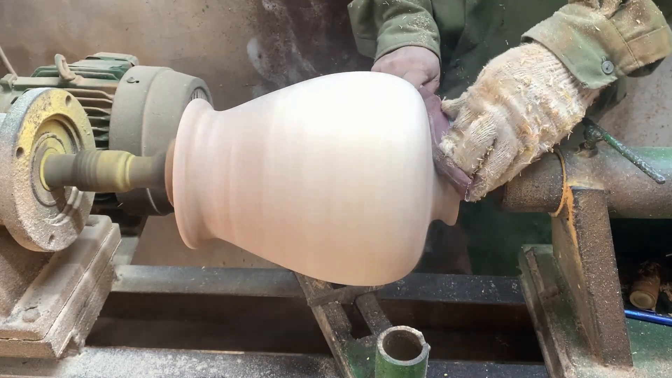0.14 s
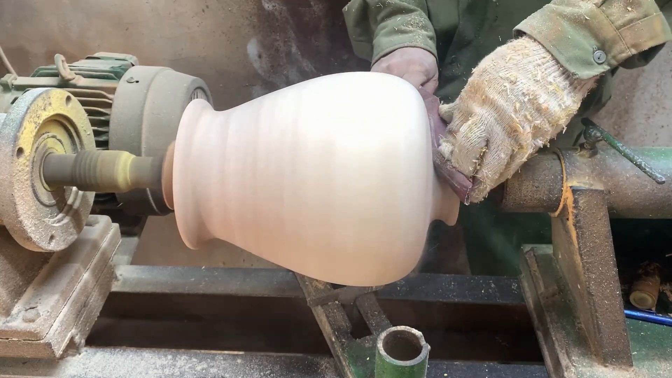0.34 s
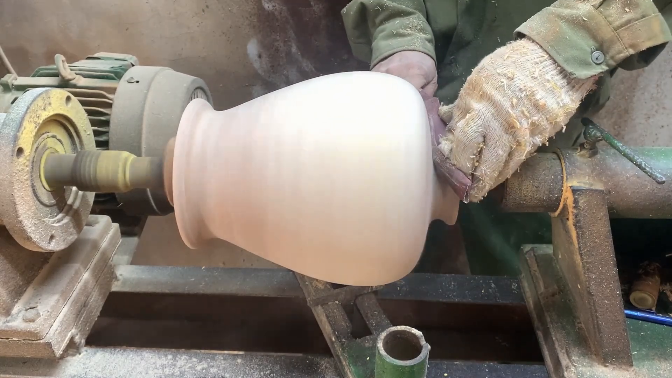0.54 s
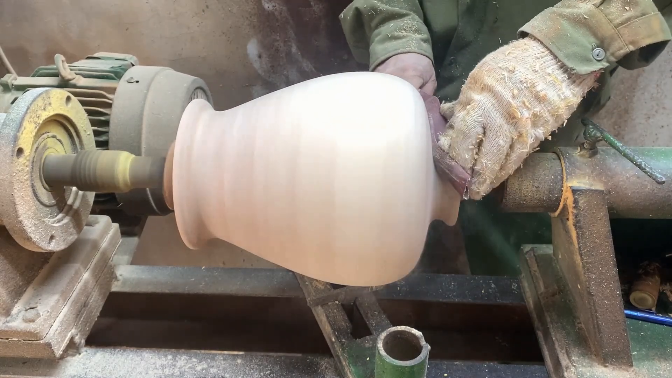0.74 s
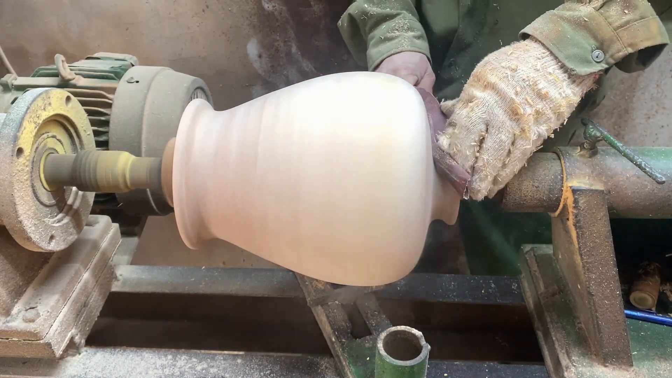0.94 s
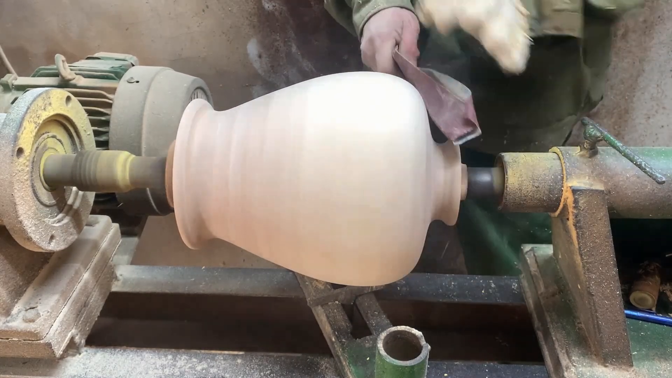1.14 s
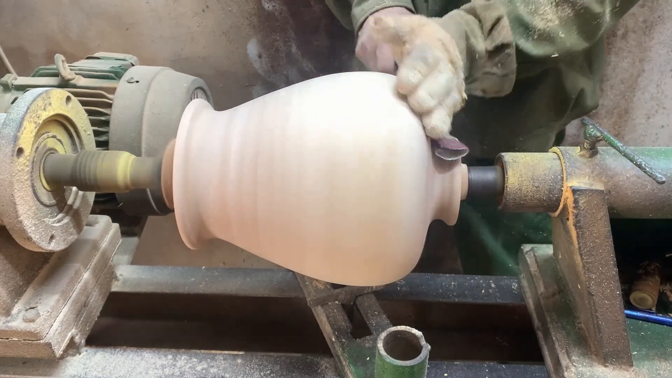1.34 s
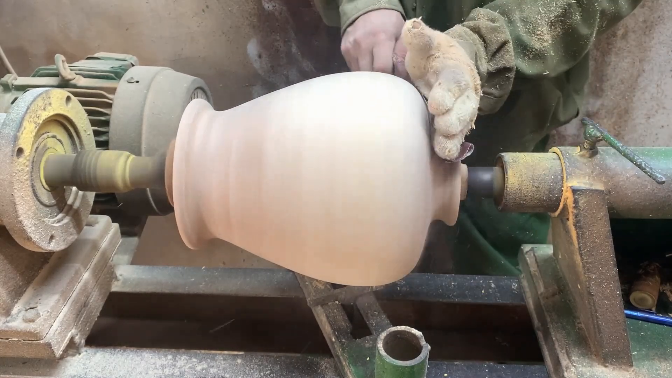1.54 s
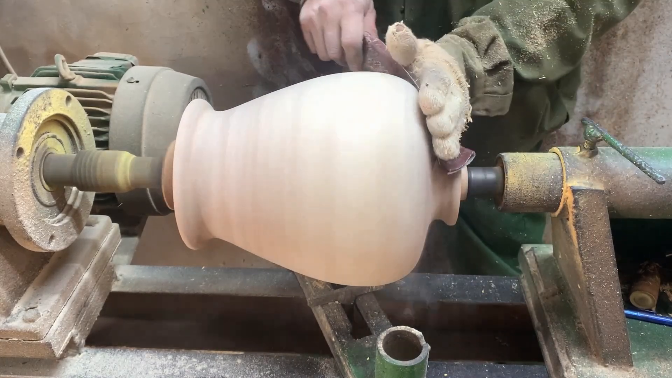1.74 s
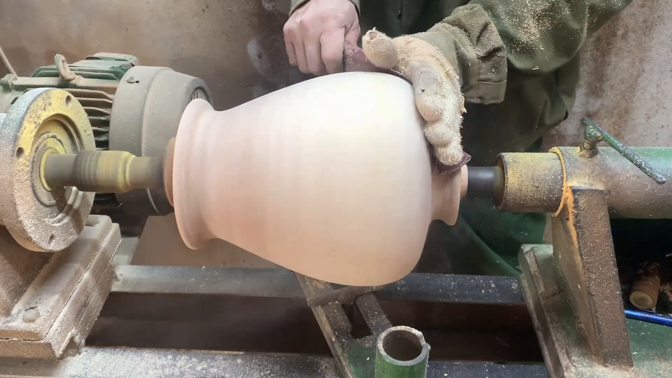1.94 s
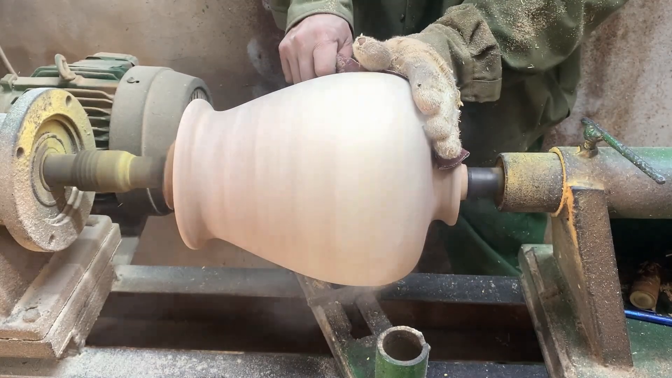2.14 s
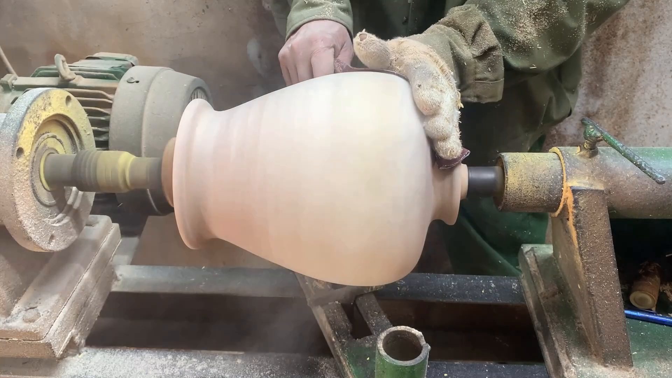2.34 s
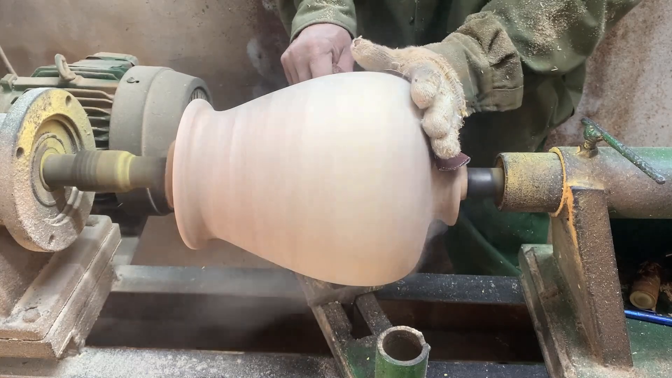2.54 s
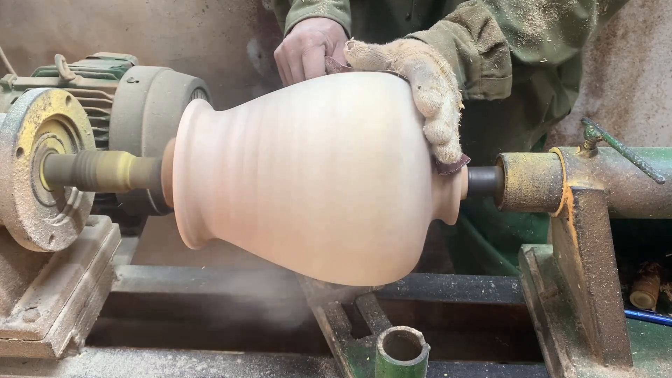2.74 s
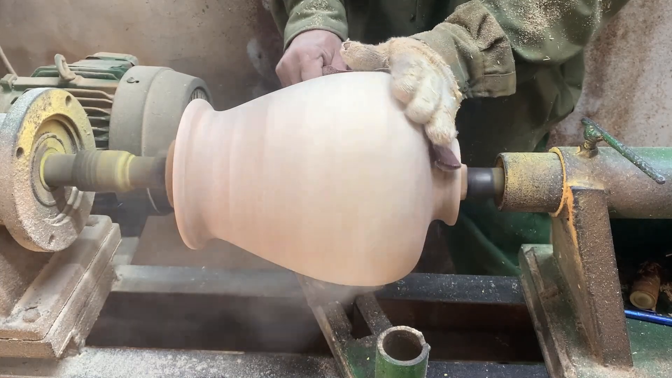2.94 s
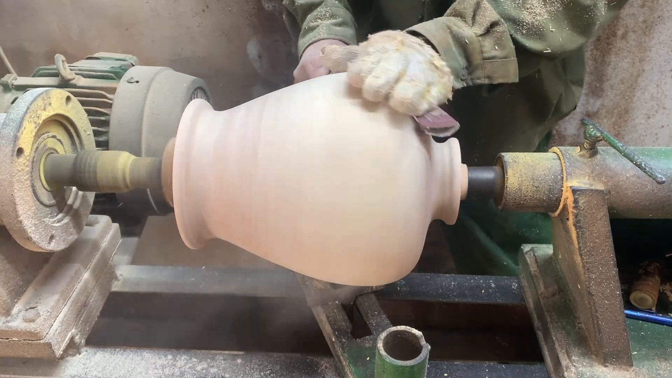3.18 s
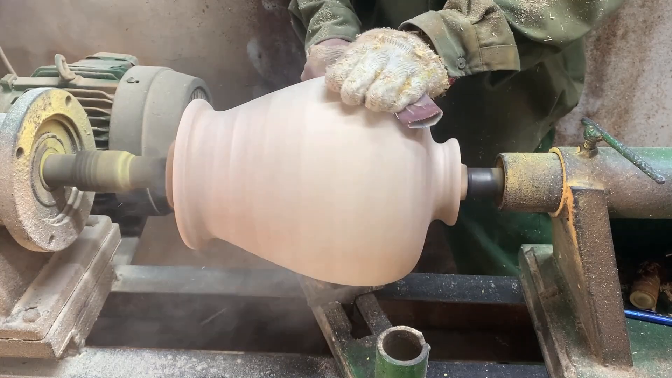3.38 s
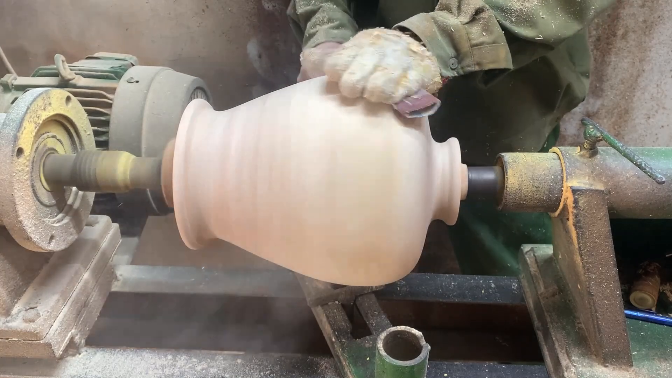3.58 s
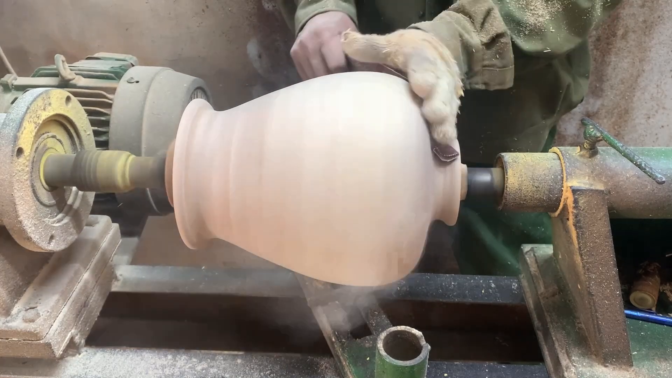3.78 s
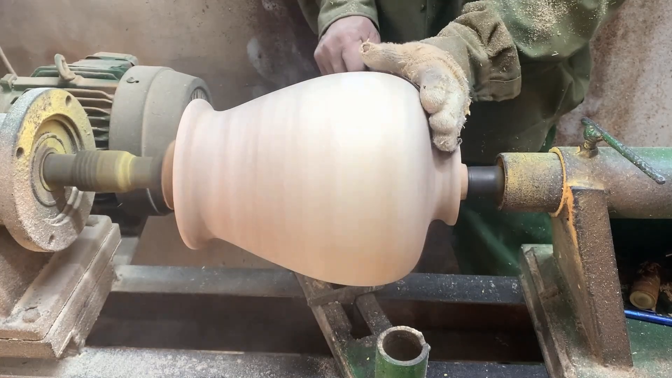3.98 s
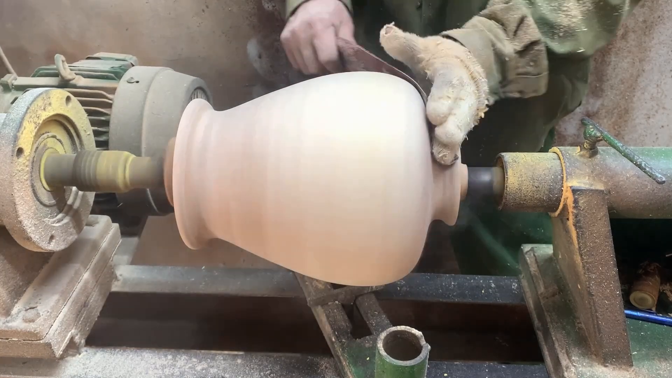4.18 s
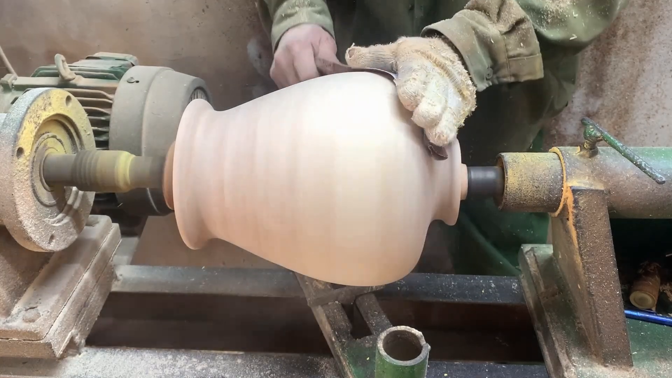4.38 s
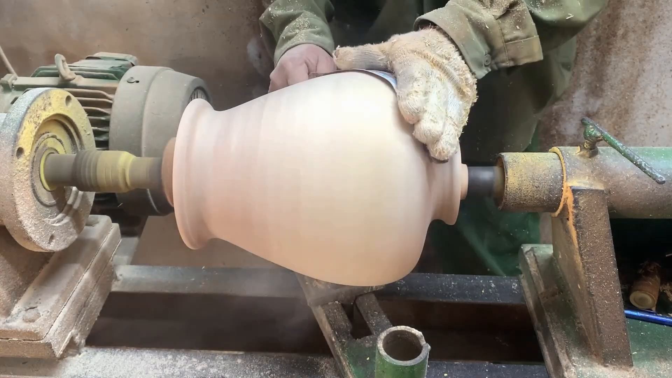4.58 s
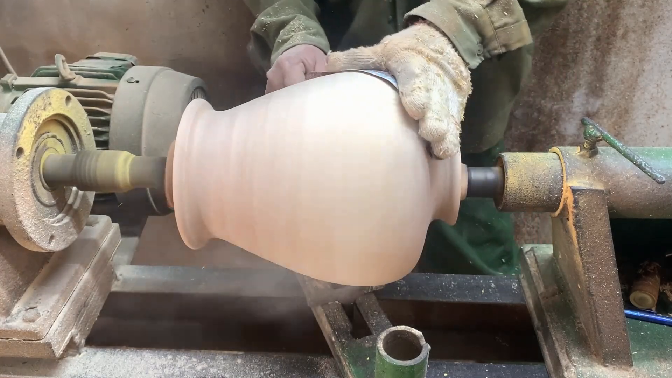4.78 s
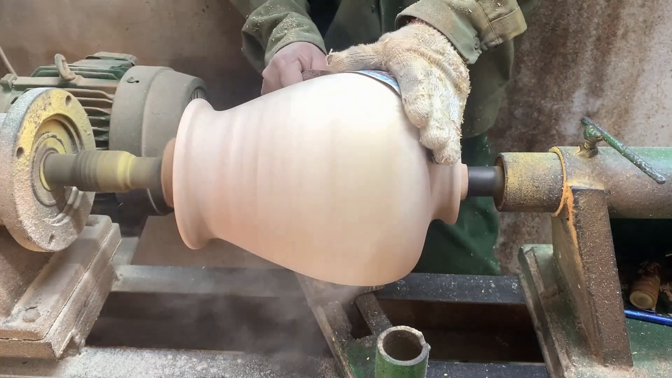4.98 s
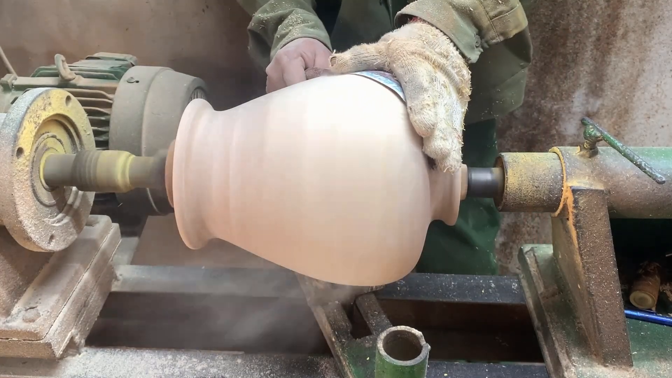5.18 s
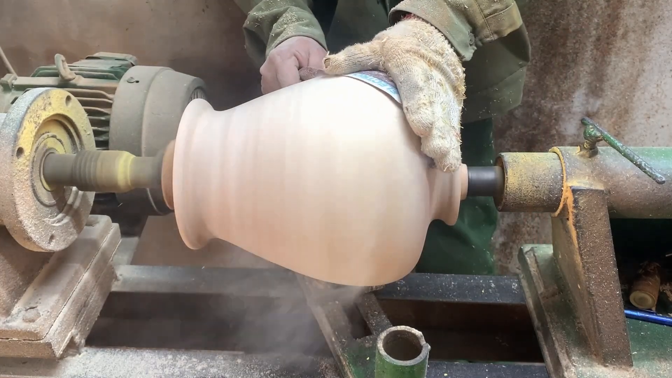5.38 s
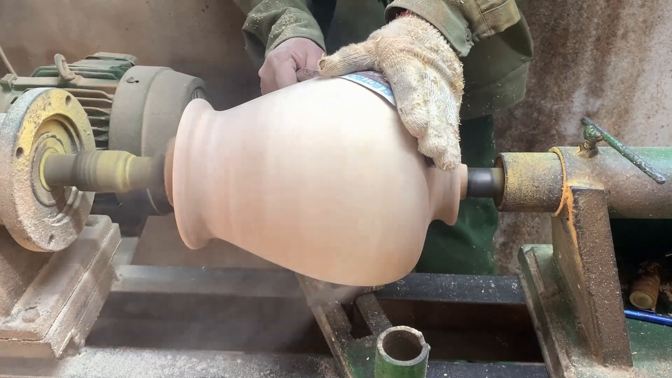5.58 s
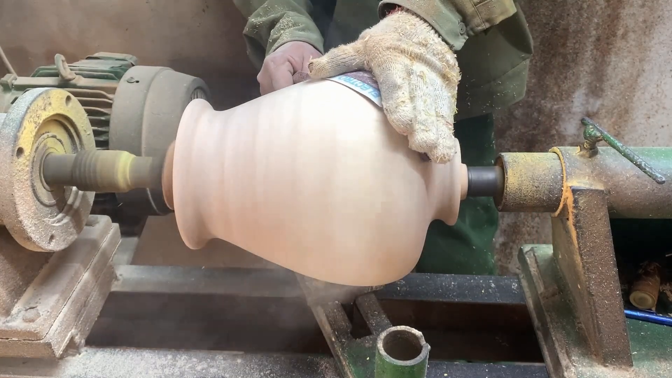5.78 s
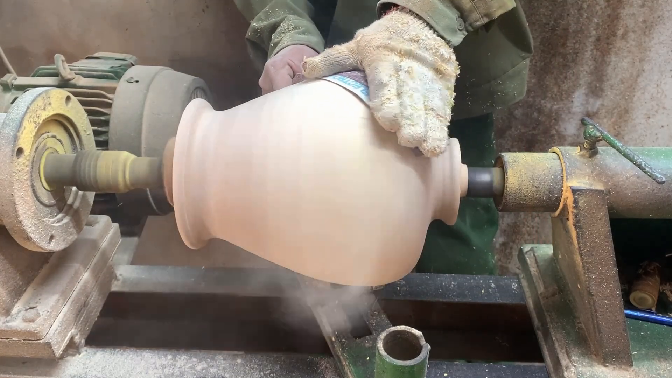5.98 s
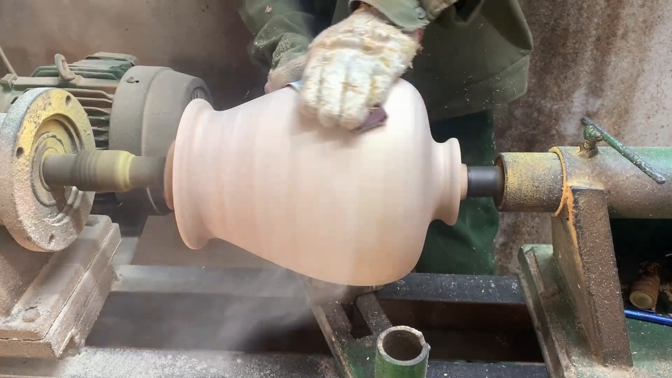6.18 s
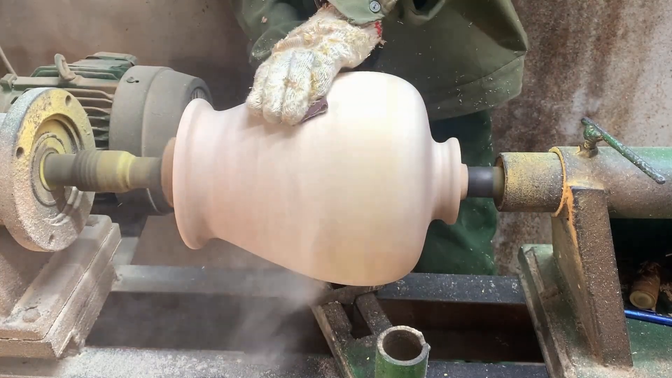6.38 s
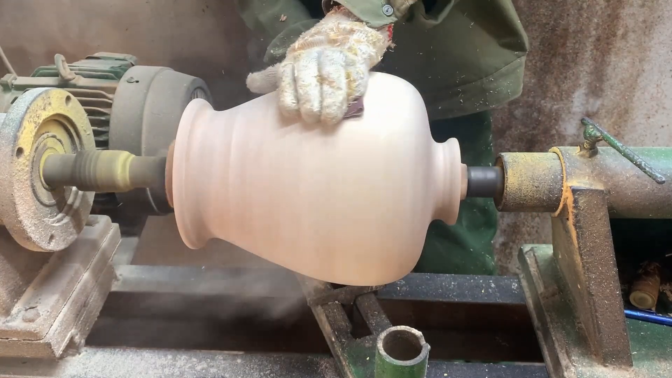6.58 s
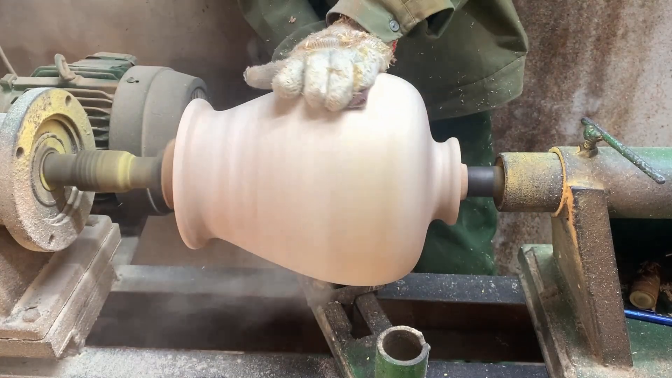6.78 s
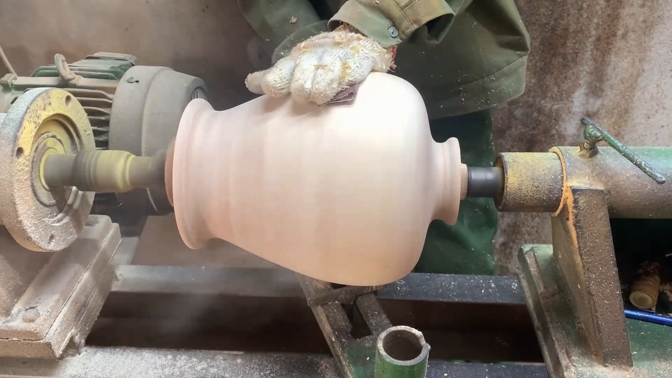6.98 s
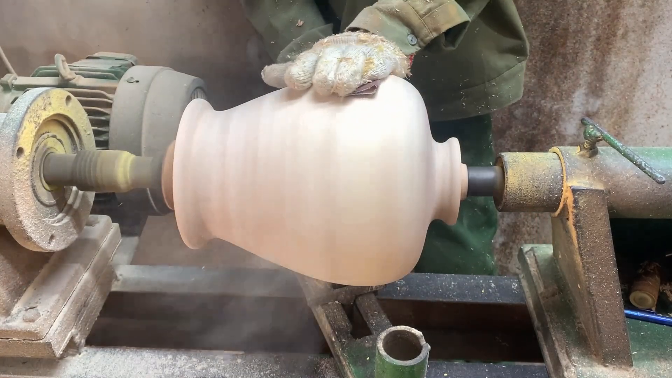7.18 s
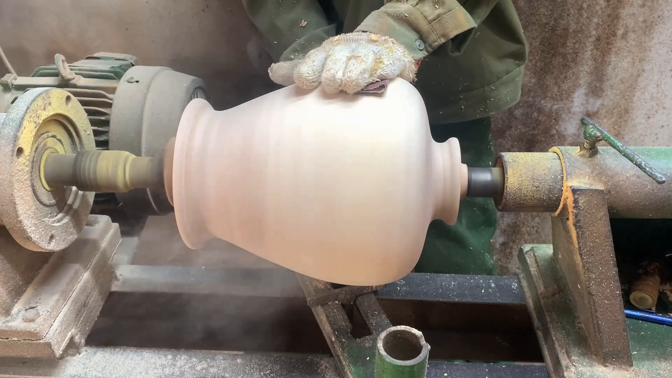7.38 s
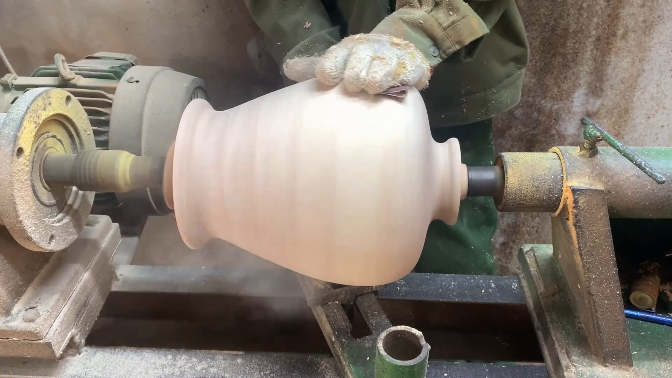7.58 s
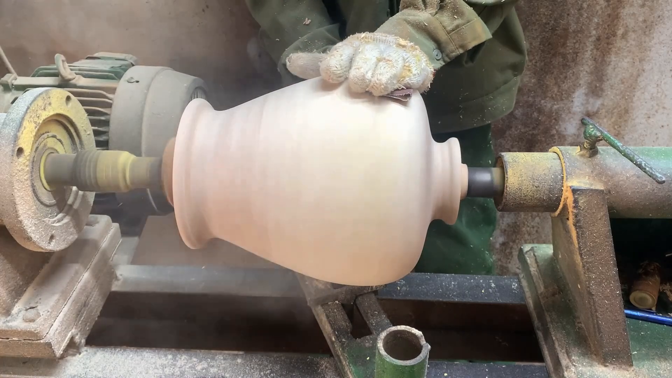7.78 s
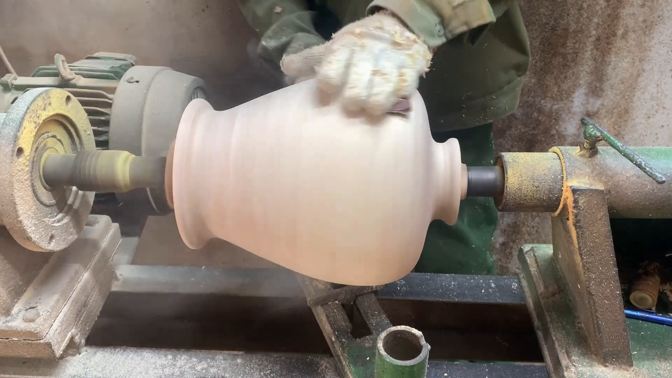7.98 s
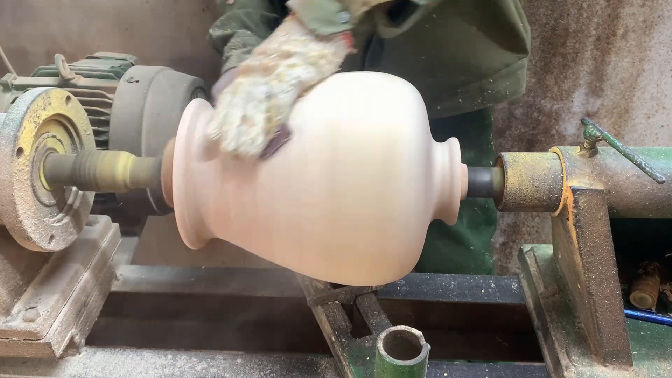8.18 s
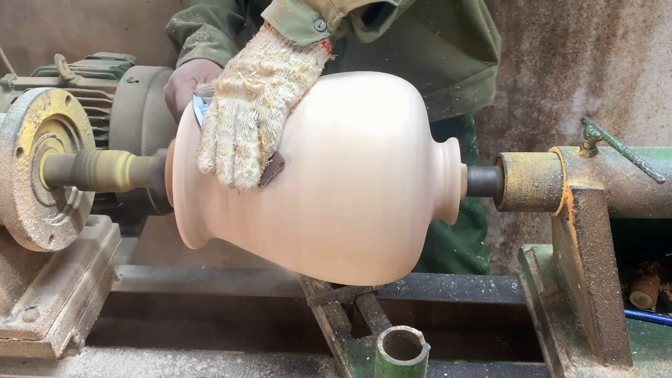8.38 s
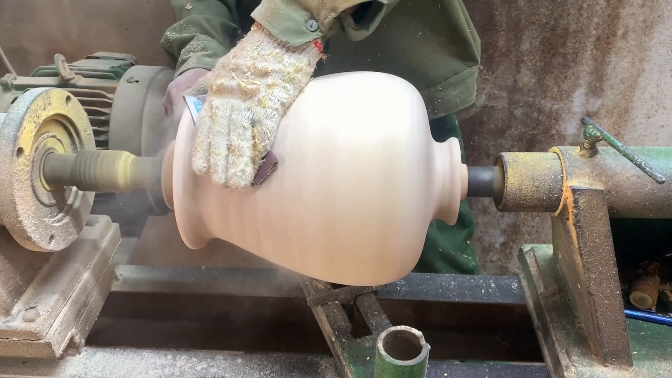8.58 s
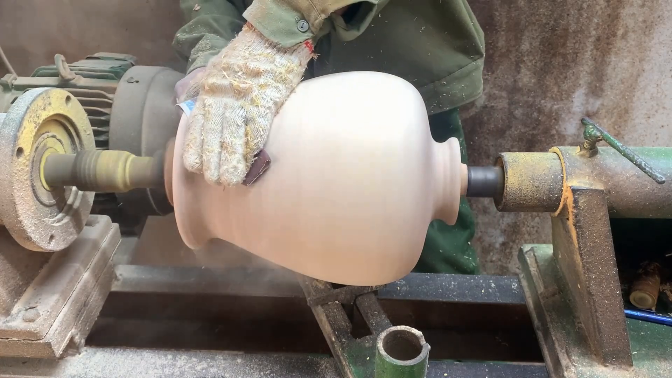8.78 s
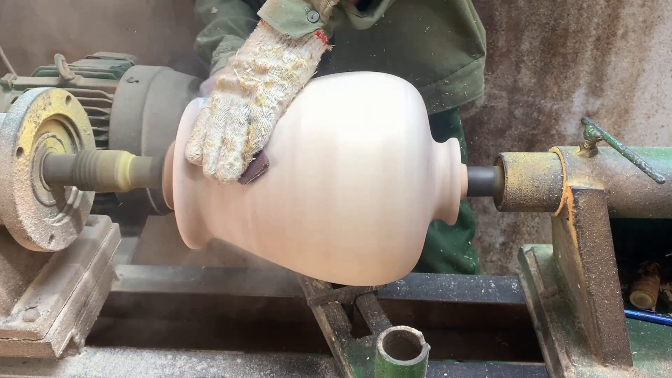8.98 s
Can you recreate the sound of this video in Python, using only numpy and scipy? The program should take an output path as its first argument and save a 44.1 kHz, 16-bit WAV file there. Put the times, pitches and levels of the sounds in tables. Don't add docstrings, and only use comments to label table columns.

```python
import sys
import numpy as np
from scipy import signal
from scipy.fft import rfft, irfft, next_fast_len
from scipy.io import wavfile
from scipy.ndimage import uniform_filter1d

SR = 44100
rng = np.random.default_rng(int(sys.argv[2]) if len(sys.argv) > 2 else 0)


def gain_from_db(level_db):
    decades = np.asarray(level_db, float) / 20
    return 10 ** decades


def to_wav(s):
    ch = np.atleast_2d(s).T
    pcm = np.round(np.clip(ch, -1, 1) * 32767)
    wavfile.write(sys.argv[1], SR, pcm.astype(np.int16))


N = 398223
T = np.arange(N) / SR

# [f/Hz, level/dB per Hz]
SHAKE_SPECTRUM = [(15, -3), (32, -0.5), (48, -4.5), (70, -2.5), (150, -3.5), (250, 0), (330, -1.5),
                  (500, -14)]
# [f/Hz, level/dB per Hz]
ROAR_SPECTRUM = [(250, -9.5), (400, -4), (700, 2.5), (1500, 0.5), (2200, -3.5), (3100, -4), (4500, -8.5),
                 (16000, -8)]
# [f/Hz, width/Hz, left level/dB, right level/dB]
BED_TONES = [(400.4, 71, -2.5, -4.5), (452, 69, -3, 0), (499, 85, -5, -4), (600, 91, -32, -8.5)]
# [f/Hz, width/Hz, left level/dB, right level/dB]
HOUSING_TONES = [(786.3, 37.4, -3, -3), (820, 72, -1.5, -2), (1071, 140, -7.5, -10.5),
                 (1216, 63, -5.5, -4.5), (2338, 83, -18, -14)]
# [t/s, level/dB]
PLAY = [(0.0, -0.5), (1.0, 0.5), (1.4, 0.5), (2.15, .5), (2.6, -3.5), (3.1, -3), (4.0, -3.5), (4.6, -3.5),
        (5.1, -7.5), (6.55, -7.5), (7.1, -4.5), (7.7, -3), (8.2, -4), (9.03, -5)]
# [t/s, bed level/dB, housing level/dB]
BOUTS = [(0.04, 5.5, 1), (0.25, -3, 2), (0.49, 3, 1.5), (1.12, 1.5, 6), (1.31, 1, 4), (1.42, 2.5, 1),
         (1.9, 0.5, 2), (2.03, -2, 0.5), (2.12, 9, 5), (2.91, 3.5, 4), (3.05, -2, -13), (3.12, -1, 4),
         (3.2, 5, -9), (3.51, -3, 4), (3.72, -1, 7), (3.78, -7, -3), (3.87, 4.5, -3), (3.97, 0, 9),
         (4.06, 3, 1), (4.62, 4, -1), (6.4, -8, 9), (7.53, 5.5, 0), (7.74, -5, -2.5), (7.87, 5, 3.5),
         (8.12, -2.5, 5), (8.2, -1.5, -12), (8.8, 4.5, -1), (8.87, -7, -2), (8.93, -1, 3)]
# [t/s, level/dB]
HUM_SWELLS = [(0.5, 6), (1.1, -3), (1.35, 4), (1.7, 9), (2.05, 6), (2.82, 7), (3.6, 1), (3.82, -8),
              (3.97, 6), (5.1, 8), (7.35, 5), (7.85, 6)]

# [t/s, pressure level/dB, surface speed (-1 neck to 1 belly),
# cupping of the paper (-1 flat to 1 folded)]
HAND = [(0.0, -37, -1.27, -0.37), (0.3, -35.5, -0.77, -0.031), (1.08, -37.5, -0.99, 0),
        (1.5, -38, -0.34, 0.44), (1.78, -35.5, -0.67, -0.11), (1.93, -32.5, -0.21, 0.3),
        (2.95, -36, -0.028, 0.26), (3.6, -38.5, .8, 0.093), (3.85, -38, -0.021, 0.35),
        (4.38, -40.5, -0.31, 0.24), (4.47, -34.5, 0.73, -0.045), (6.02, -36.5, 0.41, -0.14),
        (6.17, -38.5, 0.38, -.1), (7.0, -44.5, 0.16, 0.58), (7.35, -40, 0.32, 0), (8.08, -40, 0.51, 0.0057),
        (8.4, -35.5, -0.72, 0.73), (9.03, -38, -0.64, .8)]
# [middle t/s, length t/s, level change/dB, change of surface speed (same scale)]
PUSHES = [(0.06, .05, 2, .3), (0.55, 0.23, 1.5, 0.24), (0.9, .15, -1, -.2), (1.466, 0.075, 3.5, 0.04),
          (1.575, 0.1, 1.5, -0.41), (1.955, 0.047, 1.5, 0.051), (2.133, .06, 1, -0.51),
          (2.18, 0.071, 1.5, 0.17), (2.573, 0.3, 3, 0.4), (2.8, 0.042, -.5, -0.22), (2.822, 0.04, 2, 0.17),
          (3.126, 0.16, 0, 0.32), (3.82, 0.076, 2.5, 0.079), (4.004, .08, -1.5, -.2),
          (4.128, 0.11, -2, 0.043), (4.296, .06, 1.5, -0.14), (4.48, .06, 1, -0.034),
          (4.71, 0.15, 3, -0.13), (4.804, 0.027, -3, -.2), (5.9, .3, .5, -0.29), (6.255, 0.086, 1.5, 0.069),
          (6.5, 0.11, -1, -0.041), (6.73, .06, 0, 0.14), (6.84, 0.14, 3.5, -0.051), (7.65, .3, 0, 0.13),
          (7.973, .04, 2, .1), (7.994, 0.019, -6, 0), (8.43, .1, -0.5, -0.12), (8.723, 0.48, 1, 0.14)]
# [f/Hz, level/dB per Hz]
RUB_SPECTRUM = [(1500, -11), (2100, -3.5), (2700, 0), (3400, -7.5)]
# [f/Hz, level/dB per Hz]
RASP_SPECTRUM = [(1800, -18), (2800, -14.5), (3600, -3), (5500, -1), (7000, 0.5), (9000, -11)]
SCRAPE_SPECTRUM = [(5200, -15.5), (6800, -7), (7800, -4), (8200, -1), (8900, -5), (10200, -13.5),
                   (12000, -19)]
HISS_SPECTRUM = [(7500, -21.5), (9300, -3), (10400, 2.5), (11800, 1.5), (13200, -10), (15000, -21)]
FIZZ_SPECTRUM = [(10500, -20), (12300, 3), (13300, 7.5), (14300, 3), (15700, 3.5), (18000, -4.5)]
SPEED_DB = [-4, 1, 3.5, 2]
CUP_DB = [0, 6.5, -1, -1]
PUSH_SHARE = [0.46, 0.53, 1.4, 0.75]
LIFT_SHARE = [1.4, .9, 1, 1.3]
SKIM_S = [-0.018, .015, .03, 0.032]

# [f/Hz, level/dB]
LEFT_MIC = [(8, -9), (250, -1), (400, 0.5), (1400, -1), (4500, -4), (5800, -6.5), (7800, -6), (8300, -2),
            (15000, -0.5), (19000, 2)]
RIGHT_MIC = [(8, -5), (250, 3.5), (400, 1), (1400, -1), (4500, 1), (7900, -3.5), (8060, 1.5), (8300, -2),
             (8900, 1), (9900, 0), (15000, -0.5), (19000, -.2)]

TURN_HZ, BELT_HZ = 17.8, 4.3
KNOCKS_PER_S = 520
BOUT_S, SWELL_S = 0.095, 0.21
LIFT_S, LAND_S, LEAVE_S, TOUCH_S, LIFT_DB = 1.218, 1.375, 0.065, 0.074, -15


def evened(x):
    return x / np.sqrt(np.mean(x ** 2) + 1e-20)


def read(points, hz):
    f, value = np.transpose(points)
    return np.interp(np.log(hz + 1), np.log(f + 1), value)


def curves(rows):
    s, *columns = np.transpose(rows)
    return [np.interp(T, s, column) for column in columns]


def coloured(x, points):
    size = next_fast_len(N)
    below = (points[0][0] / 2, -60)
    above = (points[-1][0] * 1.3, -60)
    gain = gain_from_db(read([below] + list(points) + [above], np.fft.rfftfreq(size, 1 / SR)))
    return irfft(rfft(x, size) * gain, size)[..., :N]


def resonate(x, hz, width):
    pole = np.exp(2j * np.pi * hz / SR - np.pi * width / SR)
    for _ in range(2):
        x = signal.lfilter([1 - abs(pole)], [1, -pole], x)
    return 2 * x.real


def wander(rate_hz, channels=1):
    steps = rng.standard_normal((N // 64 + 2002, channels)).T
    lowpass = signal.butter(1, rate_hz * 128 / SR, output="sos")
    smooth = signal.sosfiltfilt(lowpass, steps)[:, 1000:-1000]
    return np.array([np.interp(T, np.arange(len(s)) * 64 / SR, evened(s)) for s in smooth])


def bumps(middle_s, length_s, change_db):
    coarse = T[::64]
    shape = np.exp(-abs(2 * (coarse - np.c_[middle_s]) / np.c_[length_s]) ** 3)
    return np.interp(T, coarse, np.asarray(change_db) @ shape)


def throb(hz, depths_db, slip):
    angle = 2 * np.pi * np.cumsum(hz * (1 + slip * wander(1.8)[0])) / SR
    level_db = 0
    for k, depth_db in enumerate(depths_db):
        level_db = level_db + depth_db * np.cos((k + 1) * angle + 2 * np.pi * rng.random())
    return level_db


def patchy(patchy_db, fine_db):
    noise = rng.standard_normal((2, N + 1024))
    z = signal.stft(noise, nperseg=512, noverlap=384)[2]
    patches, flecks = rng.standard_normal((2,) + z.shape)
    patches = uniform_filter1d(patches, size=8, axis=1)
    patches = evened(uniform_filter1d(patches, size=18, axis=2))
    flecks = evened(uniform_filter1d(flecks, size=8, axis=2))
    z = z * gain_from_db(patchy_db * patches + fine_db * flecks)
    return signal.istft(z, nperseg=512, noverlap=384)[1][:, :N]


def contact_db(skim_s=0):
    leaving = (T - LIFT_S - skim_s) / LEAVE_S
    landing = (LAND_S - skim_s - T) / TOUCH_S
    return LIFT_DB * np.clip(np.minimum(leaving, landing) + .5, 0, 1)


def grit_db():
    pressure_db, speed, cup = curves(HAND)
    middle_s, length_s, push_db, slide = np.transpose(PUSHES)
    push_db = bumps(middle_s, length_s, push_db)
    speed = speed + bumps(middle_s, length_s, slide)
    hand_db = pressure_db + np.c_[SPEED_DB] * speed + np.c_[CUP_DB] * cup
    return hand_db + np.c_[PUSH_SHARE] * push_db


def hum_and_shake(play_db):
    hum = evened(resonate(rng.standard_normal(N), hz=90.8, width=11))
    hum = hum * gain_from_db(-12.0 + 1.4 * wander(3.7)[0])
    shake = evened(coloured(rng.standard_normal((2, N)), SHAKE_SPECTRUM)) * gain_from_db(1.77 * wander(11.0))
    swell_s, swell_db = np.transpose(HUM_SWELLS)
    swell_db = bumps(swell_s, SWELL_S, swell_db)
    return gain_from_db(0.77 * play_db - 48.0) * (gain_from_db(0.23 * swell_db) * shake + gain_from_db(swell_db) * hum)


def roar(play_db):
    rasp_db = grit_db()[0]
    roar_db = 0.56 * play_db + 0.27 * (rasp_db + 32) + 0.22 * contact_db()
    noise = evened(coloured(patchy(1.0, 3.7), ROAR_SPECTRUM))
    return gain_from_db(roar_db - 35.0 + 0.95 * wander(66.0)) * noise


def rattle(tones, load_db, uneven_db, spread_db):
    out = np.zeros((2, N))
    for hz, width, *side_db in tones:
        knocks = rng.standard_normal((2, N)) * (rng.random((2, N)) < KNOCKS_PER_S / SR)
        hardness_db = spread_db * rng.standard_normal((2, N))
        knocks *= gain_from_db(hardness_db + load_db + uneven_db * wander(20.5, channels=2))
        out += gain_from_db(side_db)[:, None] * resonate(evened(knocks), hz, width)
    return evened(out)


def bed(bed_db):
    load_db = throb(2 * TURN_HZ, [1.3], 0.017) + 2.3 * wander(3.8, channels=2)
    return gain_from_db(bed_db - 40.0) * rattle(BED_TONES, load_db, uneven_db=2.0, spread_db=2.7)


def housing(housing_db):
    load_db = throb(TURN_HZ, [1.4], 0.021) + throb(BELT_HZ, [1.6], 0.061)
    load_db = load_db + 1.15 * wander(21.0, channels=2)
    return gain_from_db(housing_db - 39.0) * rattle(HOUSING_TONES, load_db, uneven_db=2.8, spread_db=3.5)


def lathe():
    play_db, = curves(PLAY)
    bout_s, bed_db, housing_db = np.transpose(BOUTS)
    bed_db = play_db + bumps(bout_s, BOUT_S, bed_db)
    housing_db = play_db + bumps(bout_s, BOUT_S, housing_db)
    return hum_and_shake(play_db) + roar(play_db) + bed(bed_db) + housing(housing_db)


def sanding():
    levels_db = grit_db() + np.c_[LIFT_SHARE] * contact_db(np.c_[SKIM_S])
    rasp_db, scrape_db, hiss_db, fizz_db = levels_db
    beat_db = throb(TURN_HZ, [.3, .15], 0.039) + 0.24 * wander(5.3)
    beat_db = beat_db + 0.91 * wander(110.0) + 0.28 * wander(33.0, channels=2)
    grit = patchy(0.95, 3.47)
    rasp = gain_from_db(rasp_db + 0.63) * evened(coloured(grit, RASP_SPECTRUM))
    scrape = gain_from_db(scrape_db + 1.5) * evened(coloured(grit, SCRAPE_SPECTRUM))
    hiss = gain_from_db(hiss_db + 2.5) * evened(coloured(grit, HISS_SPECTRUM))
    fizz = gain_from_db(fizz_db + 2.5) * evened(coloured(grit, FIZZ_SPECTRUM))
    _, speed, cup = curves(HAND)
    rub_db = rasp_db - 4.5 * speed - 6.5 * cup - 13.5
    rub = gain_from_db(rub_db) * evened(coloured(grit, RUB_SPECTRUM))
    return gain_from_db(beat_db) * (rub + rasp + scrape + hiss + fizz)


def scene():
    return lathe() + sanding()


def low_pass(x):
    return signal.sosfilt(signal.butter(12, 17050, fs=SR, output="sos"), x)


def record(dry):
    heard = np.array([coloured(dry[0], LEFT_MIC), coloured(dry[1], RIGHT_MIC)])
    edge = signal.firwin(2047, 15735, window=("kaiser", 11), fs=SR)
    mix = signal.oaconvolve(heard, edge[None], "same")
    return low_pass(mix)


dry = scene()
out = record(dry)
to_wav(out)
```